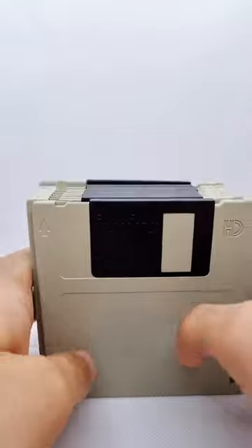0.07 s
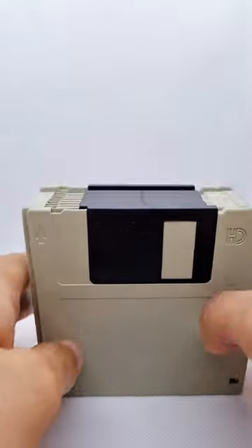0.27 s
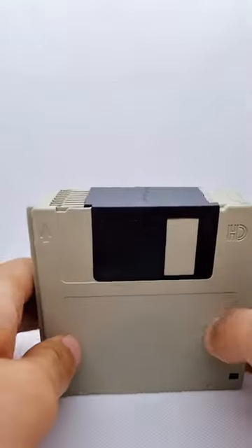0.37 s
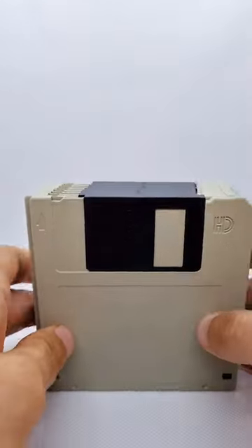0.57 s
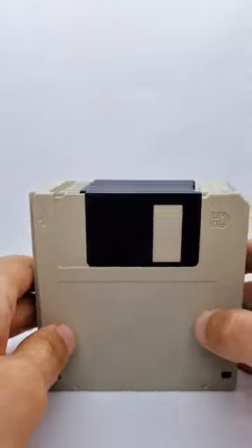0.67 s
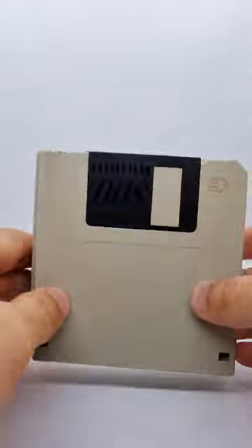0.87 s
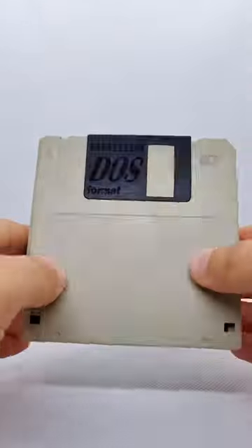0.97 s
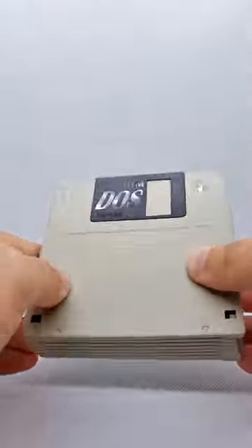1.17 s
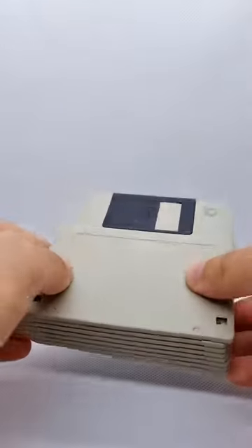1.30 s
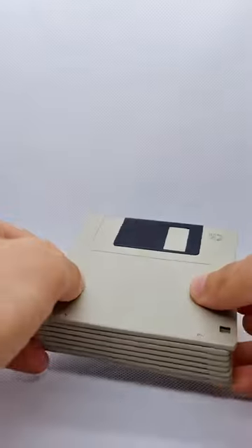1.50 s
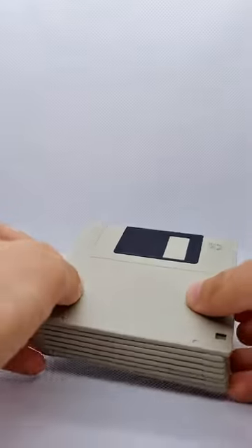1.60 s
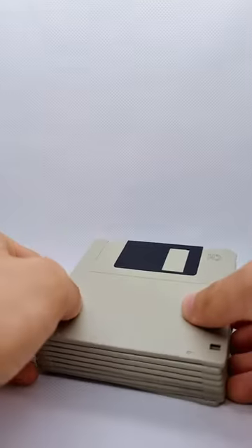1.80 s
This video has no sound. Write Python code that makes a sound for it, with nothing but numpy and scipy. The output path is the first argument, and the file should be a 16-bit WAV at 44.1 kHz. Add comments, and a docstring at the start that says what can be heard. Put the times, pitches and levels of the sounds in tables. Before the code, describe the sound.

Close up in a quiet room with a low hum, plastic floppy disks slide and clack twice against a desk. Light clicks and rustles follow as the stack is straightened, ending with a soft, dull thump.

```python
"""A small, quiet room hums low. Close to a stereo microphone, a stack of plastic floppy disks is
knocked twice on a desk: the shells slide before each landing, then the desk rings and loose
shutters clatter. From 0.3 s fingers rustle and square up the stack with faint scrapes and ticks.
One shell knocks hollowly on the next at 1.56 s, and at 1.8 s the stack is laid flat."""
import sys
import numpy as np
from scipy import signal
from scipy.fft import rfft, irfft
from scipy.io import wavfile
from scipy.ndimage import uniform_filter1d

SR = 44100
rng = np.random.default_rng(int(sys.argv[2]) if len(sys.argv) > 2 else 0)


def pcm_store(signal):
    """Save signal as 16-bit PCM."""
    levels = np.round(np.clip(np.atleast_2d(signal), -1, 1) * 32767)
    wavfile.write(sys.argv[1], SR, levels.astype(np.int16).T)


N = 81585
HZ, T = np.fft.rfftfreq(N, 1 / SR), np.arange(N) / SR


def amp(db):
    """Decibels to gain."""
    return 10 ** (np.asarray(db) / 20)


def unit(x):
    """Scales to rms 1."""
    return x / np.sqrt(np.mean(x ** 2) + 1e-20)


def curve(points, hz=HZ):
    """Joins breakpoints on a log-frequency axis."""
    freqs, values = np.transpose(points)
    return np.interp(np.log(hz + 1), np.log(freqs + 1), values)


def colour(x, gain):
    """Minimum-phase EQ of unit power, shaped like the gain curve."""
    size = 4096
    gain = unit(np.interp(np.fft.rfftfreq(size, 1 / SR), HZ, gain))
    cepstrum = irfft(np.log(np.maximum(gain, 1e-5)))
    cepstrum[1:size // 2] *= 2
    cepstrum[size // 2 + 1:] = 0
    impulse = irfft(np.exp(rfft(cepstrum)))[None, :size // 2]
    return signal.oaconvolve(x, impulse, axes=1)[:, :N]


def grains(spread_db):
    """Two streams of tiny slips of uneven size."""
    size = amp(spread_db * np.minimum(rng.exponential(1, N // 16 + 1), 4)).repeat(16)[:N]
    return unit(rng.standard_normal((2, N)) * size)


# Phase lead of the left microphone: freq_hz, lead_rad
LEFT_LEAD = [(60, 0.5), (170, 0.04), (280, 2.0), (420, 1.5), (900, 3), (2000, 3.5), (3500, 5), (7000, 3),
             (14000, 1.54)]
# How alike the two sides are for close sounds: freq_hz, coherence
CLOSE_COHERENCE = [(60, 0.9), (300, 0.98), (900, 0.64), (2000, 0.63), (4000, 0.46), (14000, 0.38)]
# Pan of the disks and their reverb: freq_hz, left_gain_db
DISK_PAN = [(60, -5), (270, -7), (500, -7), (1000, -7.5), (2000, -5), (3300, 0.5), (6000, 6), (9000, 6.5),
            (14000, -3)]
# Pan of the room tone and fingers: freq_hz, left_gain_db
BACKGROUND_PAN = [(60, -3.5), (200, -4.5), (400, -7), (1300, -4.5), (2500, -9), (5000, -4), (8000, -1.5),
                  (14000, -7)]
def mic_pair(x, pan, coherence=CLOSE_COHERENCE):
    """Stereo image: the first stream feeds both microphones, the second widens the left."""
    common, wide = rfft(x)
    alike = np.clip(curve(coherence), 0, 1)
    blend = alike * common + np.sqrt(1 - alike ** 2) * wide
    left = blend * amp(curve(pan)) * np.exp(1j * curve(LEFT_LEAD))
    return irfft(np.array([left, common]), N)


# Colour of the air: freq_hz, gain_db
AIR_EQ = [(20, -9.5), (60, 5.5), (120, -5), (250, -1.5), (400, -8.5), (700, -6), (1500, -14), (3000, -20),
          (5000, -29), (8500, -41.5), (13000, -31), (15500, -34.5)]
# Stereo likeness of the room tone: freq_hz, coherence
AIR_COHERENCE = [(60, 0.63), (150, 1), (400, 1), (1200, 0.598), (3000, .3), (14000, .1)]
# Partials of the hum: pitch_hz, level_db
HUM_PARTIALS = [(62, -74), (183, -68), (366, -71)]
def room_tone():
    """Steady air noise under a low hum that wavers in level and phase."""
    air_db, waver = -63, 0.71
    bed = amp(air_db) * unit(irfft(rfft(rng.standard_normal((2, N))) * amp(curve(AIR_EQ)), N))
    for hz, db in HUM_PARTIALS:
        drift = unit(irfft(rfft(rng.standard_normal((2, N))) / (1 + (HZ / 5) ** 2), N))
        tone = np.sin(2 * np.pi * hz * T + 2 * waver * drift[1])
        bed[0] += amp(db) * unit((1 + waver * drift[0]) * tone)
    return mic_pair(bed, BACKGROUND_PAN, AIR_COHERENCE)


# Decay of the room's tail: freq_hz, t60_s
REVERB_DECAY = [(100, .33), (300, .27), (800, .28), (2000, .18), (5000, .14), (15000, .09)]
# Colour of the reverb: freq_hz, gain_db
REVERB_EQ = [(100, -8.5), (300, -5), (800, -9.5), (2000, -8), (5000, -4), (15000, -4.5)]
# Stereo likeness of the reverb: freq_hz, coherence
REVERB_COHERENCE = [(60, 0.45), (300, 1), (900, 0.23), (2000, 0.34), (4000, 0.86), (14000, 0.36)]
def room_reverb(x):
    """Quick reflections off the desk and backdrop, then the short tail of a small room."""
    early_db, late_db, early_t60_s, predelay_s = -5, -8, 0.034, 0.0022
    t = T[:SR // 2]
    early, late = rng.standard_normal((2, 2, len(t))) * (t > predelay_s)
    early = early * amp(-60 * t / early_t60_s)
    hz, frame_s, bands = signal.stft(late, SR, nperseg=256)
    fade = amp(-60 * frame_s / curve(REVERB_DECAY, hz)[:, None])
    late = signal.istft(bands * fade, SR)[1][:, :len(t)]
    impulse = (amp(late_db) * unit(late) + amp(early_db) * unit(early)) / np.sqrt(len(t))
    wet = signal.fftconvolve(x[None], impulse, axes=1)[:, :N]
    tint = amp(curve(REVERB_EQ))
    return mic_pair(colour(wet, tint) * np.sqrt(np.mean(tint ** 2)), DISK_PAN, REVERB_COHERENCE)


# Bright friction hiss, for fingers and slides: freq_hz, gain_db
HISS_EQ = [(100, -41), (3000, -4.5), (6000, -2), (9000, -7), (12000, 2), (15500, 4)]
# Fingers shifting their grip: start_s, end_s, level_db
GRIP_CUES = [(.0, 0.14, -73), (0.325, 0.605, -72), (0.757, 0.896, -81.5), (1.353, 1.424, -69.5)]
def finger_rustle():
    """Skin creeps over the textured plastic in tiny dry ticks."""
    gate = sum(amp(db) * (T > start) * (T < end) for start, end, db in GRIP_CUES)
    ticks = uniform_filter1d(gate, size=400) * grains(spread_db=10)
    return mic_pair(colour(ticks, amp(curve(HISS_EQ))), BACKGROUND_PAN)


# Resonances of the shells: centre_hz, width_hz, boost_db
SHELL_PEAKS = [(836.7, 99, 7.6), (1154.4, 93.8, 5.87), (1439, 95, 6.1), (1799, 200, 4), (2020, 51, 3.9),
               (2697, 150, 2.1), (3240, 120, 4.1), (3745, 141.2, 5), (4240, 52, 4.3), (5810, 360, 6),
               (7020, 270, 4.95)]
def shell_ring():
    """Gain curve of the hollow plastic shells' resonances."""
    return amp(sum(db / (1 + (2 * (HZ - hz) / width) ** 2) for hz, width, db in SHELL_PEAKS))


# Broad body of the rub: freq_hz, gain_db
RUB_EQ = [(60, -12), (200, 10), (400, 16.5), (850, 15), (1600, 11.5), (3200, -0.5), (6000, -17.5),
          (9000, -25.5), (15500, -35)]
# Sliding strokes: start_s, length_s, level_db, centre_hz, relative_hiss_db, rub_left_gain_db
SLIDE_CUES = [(-.02, 0.077, -46.5, 750, -22, 7), (0.013, 0.033, -43, 2430, -22, 2),
              (0.031, 0.036, -38.5, 3010, -23, 2.5), (0.057, 0.025, -35, 3230, -22, 3),
              (0.08, 0.043, -39.5, 2320, -20, -5), (0.127, 0.051, -41.5, 2550, -14.5, 8.5),
              (0.143, 0.02, -32, 2900, -22, -3), (0.281, .02, -41, 1430, -52, -4),
              (0.305, 0.073, -52.5, 1530, -12.5, -0.5), (0.367, 0.081, -49.5, 2150, -16, -0.5),
              (0.424, .028, -44.5, 1300, -41, -28), (0.453, 0.06, -54, 1395, -11, 2),
              (0.5, 0.095, -56, 863, -15, -2), (0.634, 0.021, -57, 1250, -30, -9),
              (0.772, 0.048, -57.5, 1480, -13.5, -5.5), (0.832, 0.061, -61, 1400, -13.5, -11),
              (1.036, .018, -61.5, 2000, -26.5, -0.5), (1.104, 0.072, -61, 1093, -16.5, 0),
              (1.174, 0.069, -59, 1400, -22, 2), (1.353, 0.059, -63.5, 1700, -7, 3),
              (1.688, 0.04, -57.5, 2700, -32.5, 0), (1.792, 0.04, -53, 897, -24, 1)]
def slides():
    """Shells and fingers stick and slip, sounding a broad peak and the shells, with hiss on top."""
    rise_share, fall_share, width_octaves, rub_trim_db = 0.38, 0.4, 0.5, -5.5
    out, hiss = np.zeros((2, N)), np.zeros((2, N))
    ring, rub = shell_ring(), amp(curve(RUB_EQ) + rub_trim_db)
    for start, length, db, hz, hiss_db, left_db in SLIDE_CUES:
        progress = (T - start) / length
        stroke = amp(db) * np.clip(np.minimum(progress / rise_share, (1 - progress) / fall_share), 0, 1)
        peak = np.exp(-(np.log2((HZ + 1) / hz) / width_octaves) ** 2)
        scrape = colour(stroke * grains(spread_db=1), (peak + rub) * ring)
        out += mic_pair(scrape, DISK_PAN) * amp([[left_db], [0]])
        hiss += amp(hiss_db) * stroke * grains(spread_db=1)
    return out + mic_pair(colour(hiss, amp(curve(HISS_EQ))), DISK_PAN)


# Brief catches of a shell: peak_s, level_db, half_length_s, pitch_hz
CHATTER_CUES = [(.046, -45.5, 0.018, 3110), (0.158, -19.5, 0.003, 1464), (0.1947, -34.5, 0.0022, 2330),
                (0.3, -35.5, 0.004, 2393), (.438, -60.5, 0.014, 1147), (.439, -57, 0.0099, 1400),
                (.44, -62, .012, 820), (1.216, -58.5, .012, 1780), (1.705, -60.5, 0.0068, 2752)]
def edge_chatter():
    """A catching edge drives one resonance of a shell for a moment."""
    relative_bandwidth = 0.06
    out = np.zeros((2, N))
    for peak_s, db, half_length, hz in CHATTER_CUES:
        b, a = signal.iirpeak(hz, 1 / relative_bandwidth, fs=SR)
        swell = np.exp(-np.minimum(((T - peak_s) / half_length) ** 2, 50))
        out += amp(db) * swell * unit(signal.lfilter(b, a, rng.standard_normal((2, N))))
    return mic_pair(out, DISK_PAN)


# Colour of the plastic: freq_hz, gain_db
SHELL_EQ = [(100, -29), (600, -6.5), (1300, 10.5), (2500, 3.5), (4000, -2), (6000, -9), (9000, -16),
            (12500, -6), (15500, -8.5)]
# Shell and shutter clicks: start_s, level_db, decay_s, treble_tilt_db_per_octave, left_gain_db
CLATTER_CUES = [(.003, -32.5, 0.0012, 2, -7), (0.0755, -30.5, 0.0069, -3.5, -1),
                (0.1607, -19, 0.0013, -2.5, -1), (0.1621, -20, .0022, 0, 4.5),
                (0.195, -37.5, 0.0018, -7.5, -11.5), (.297, -25, 0.0012, -2.5, -2.5),
                (.310, -25, 0.0013, -8, -3), (0.3156, -37.5, 0.0028, -7.5, -8.5), (.40, -58, 0.0041, 3, 4),
                (0.419, -60, 0.0028, -4.5, 21.5), (0.486, -40, 0.0012, -0.5, -8),
                (0.865, -64.5, .002, 1, 7.5), (1.379, -47, 0.0025, -12, -8), (1.801, -58, 0.0038, 2.5, -3),
                (1.818, -61, 0.002, -2, -12), (1.828, -53, 0.009, -1.5, -14),
                (1.842, -54.5, 0.0042, 2.5, 0)]
def clatter():
    """Loose shells and shutters strike in a quick, dying flurry."""
    attack_s = 0.0001
    out, shell = np.zeros((2, N)), shell_ring() * amp(curve(SHELL_EQ))
    treble_octaves = np.log2(np.maximum(HZ / 2000, 1))
    for start, db, decay, tilt_db, left_db in CLATTER_CUES:
        t = np.maximum(T - start, 0)
        envelope = (1 - np.exp(-t / attack_s)) * np.exp(-np.minimum(t / decay, 50))
        click = colour(grains(spread_db=3) * envelope, shell * amp(tilt_db * treble_octaves))
        out += amp([[db + left_db], [db]]) * mic_pair(click, DISK_PAN)
    return out


def struck(hits, modes, attack_s):
    """Soft blows ring a body's damped modes."""
    out = np.zeros(N)
    for start, db in hits:
        t = np.maximum(T - start, 0)
        ring = sum(amp(mode_db - 60 * t / t60) * np.sin(2 * np.pi * hz * t) for hz, mode_db, t60 in modes)
        out += amp(db) * (1 - np.exp(-t / attack_s)) * ring
    return out


# Shell-on-shell taps: start_s, level_db
TAP_CUES = [(1.5595, -40), (1.8045, -51.5)]
# Their hollow ring: pitch_hz, gain_db, t60_s
TAP_RING = [(511, 1.5, 0.028), (588, -3, 0.032), (1470, -10, 0.042)]
def shell_taps():
    """One hollow shell knocks against the next."""
    return struck(TAP_CUES, TAP_RING, attack_s=0.00073)


# Contacts as the stack goes down: start_s, level_db
LAY_CUES = [(1.806, -38), (1.8305, -38.5), (1.841, -45.5)]
# Their dull ring: pitch_hz, gain_db, t60_s
LAY_RING = [(174.5, -4, 0.064), (247, 2, .07), (381, -5.5, 0.067), (806, 1, 0.018)]
def lay_flat():
    """The stack is laid flat with a low, dead ring."""
    return struck(LAY_CUES, LAY_RING, attack_s=0.0024)


# Low thumps of the stack and hands: start_s, level_db, pitch_hz, t60_s
THUMP_CUES = [(-.002, -38, 98.6, .12), (0.079, -27, 113.5, .08), (0.191, -39.5, 64, 0.19),
              (0.296, -49.5, 100, 0.16), (0.392, -48.5, 109.5, 0.22), (1.8053, -38, 81.6, 0.1036),
              (1.832, -29, 101, 0.073)]
def desk_thumps():
    """Soft landings push the desk into a few low swings."""
    return sum(struck([(start, db)], [(hz, 0, t60)], attack_s=0.00079)
               for start, db, hz, t60 in THUMP_CUES)


# Square landings: start_s, level_db
LANDING_CUES = [(-.002, -41), (.163, -19.5)]
# Low modes of the desk: pitch_hz, gain_db, t60_s
DESK_LOW_MODES = [(264, 0, .22), (294, -10, .16)]
def desk_low_ring():
    """The desk rings in two low tones when the stack lands."""
    return struck(LANDING_CUES, DESK_LOW_MODES, attack_s=0.0027)


# Modes of the desk top: pitch_hz, gain_db, t60_s
DESK_RING = [(117, -41.5, 0.7), (398.2, -16, 0.13), (511, -24.5, .06), (554, -32, 0.078),
             (706, -25.5, 0.33), (851, -25.5, 0.1), (881, -9.5, 0.082), (932, -20, .1), (1073, -21.5, 0.11),
             (1160, -31.5, 0.064), (1432, -24, 0.11), (1810, -23.5, .07)]
# Blows on the desk: peak_s, level_db, pitch_hz, ring_send_db
KNOCK_CUES = [(.002, -40, 600, 16), (0.0751, -25.5, 1440, -13.5), (.0774, -8.5, 733, -14),
              (0.081, -10.5, 561.4, 8), (0.155, -25, 1195, -2), (0.1576, -8, 1129, -22.5),
              (0.161, 1, 867, -6.5), (0.1642, -9, 495, 9.5), (0.1942, -21.5, 877, -12),
              (0.296, -26, 1252, -2.5), (.728, -44, 800, -18), (1.8317, -38.5, 750, -17)]
def desk_knocks():
    """Each blow radiates one short push and rings the desk."""
    push_damping = 0.23  # higher makes the push tighter
    out, t = np.zeros(N), T[:SR // 2]
    desk = sum(amp(db - 60 * t / t60) * -np.cos(2 * np.pi * hz * t) for hz, db, t60 in DESK_RING)
    for peak_s, db, hz, send_db in KNOCK_CUES:
        phase = 2 * np.pi * hz * (T - peak_s)
        force = np.exp(-np.minimum((phase / 2) ** 2, 100))
        push = -force ** push_damping * np.cos(phase)
        ring = signal.oaconvolve(force / force.sum(), desk)[:N]
        out += amp(db) * (push + amp(send_db) * ring)
    return out


def scene():
    """Impacts and handling up close, with the room's reverb and tone behind them."""
    blows = desk_knocks() + desk_thumps() + desk_low_ring() + shell_taps() + lay_flat()
    impacts = mic_pair(np.array([blows, np.zeros(N)]), DISK_PAN)
    direct = impacts + clatter() + slides() + edge_chatter() + finger_rustle()
    return direct + room_reverb(direct[1]) + room_tone()


def record(dry):
    """The recorder's low cut and band limit."""
    low_cut_hz, high_cut_hz = 12, 15850
    low_cut = signal.butter(2, low_cut_hz, "high", fs=SR, output="sos")
    high_cut = signal.firwin(401, high_cut_hz, window=("kaiser", 9), fs=SR)
    return signal.oaconvolve(signal.sosfilt(low_cut, dry), high_cut[None], "same")


dry = scene()
out = record(dry)
pcm_store(out)
```